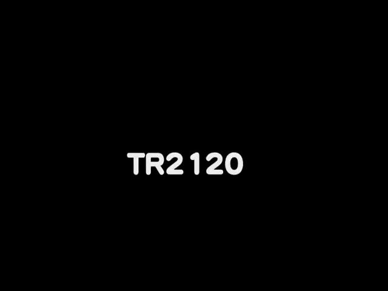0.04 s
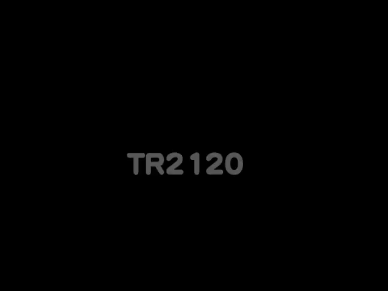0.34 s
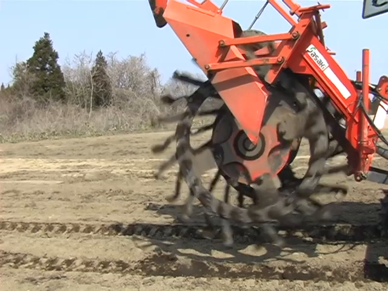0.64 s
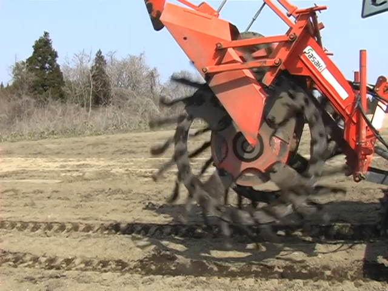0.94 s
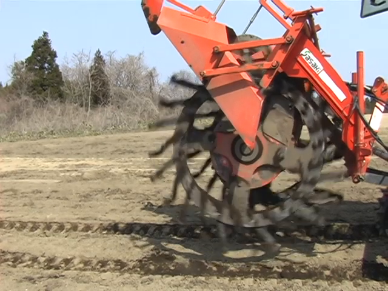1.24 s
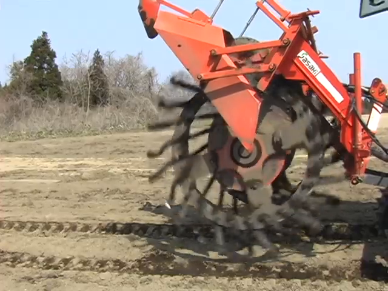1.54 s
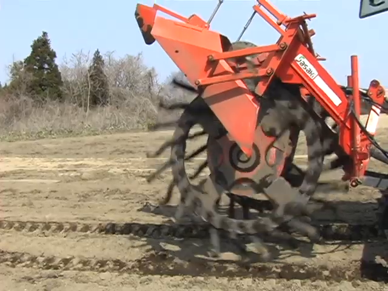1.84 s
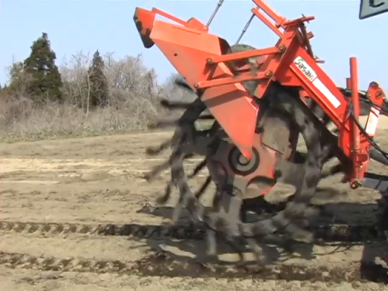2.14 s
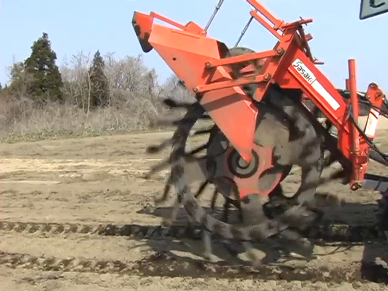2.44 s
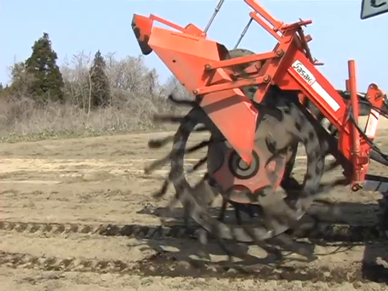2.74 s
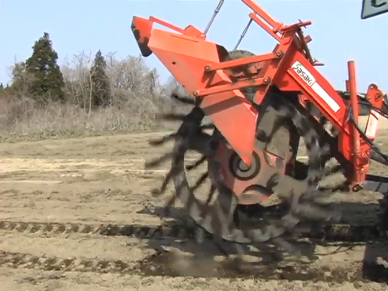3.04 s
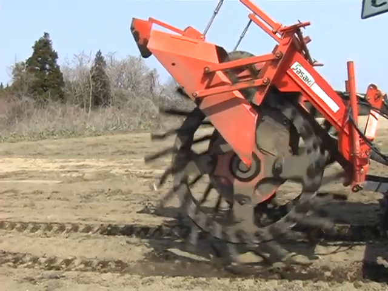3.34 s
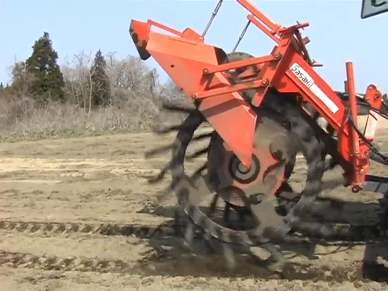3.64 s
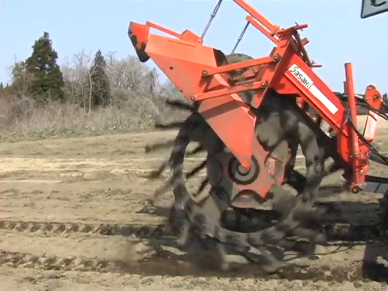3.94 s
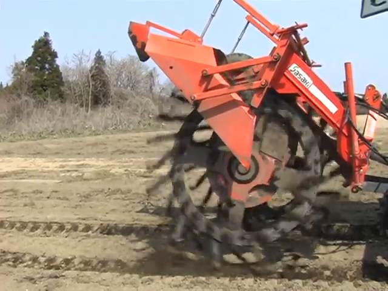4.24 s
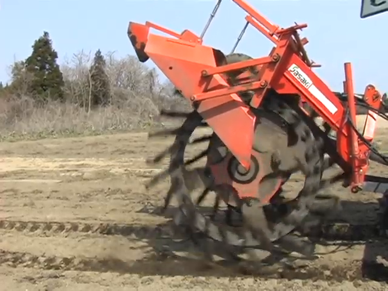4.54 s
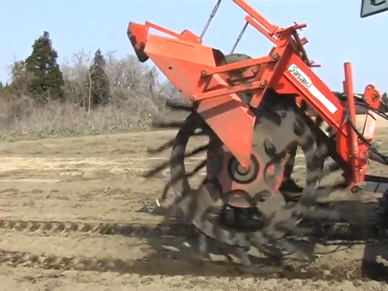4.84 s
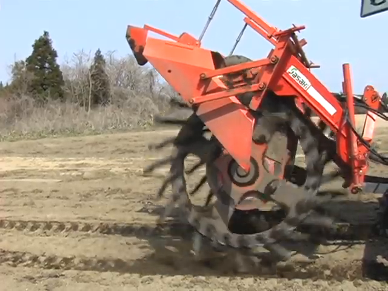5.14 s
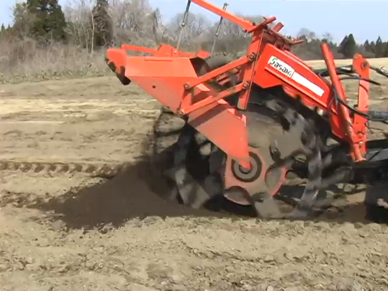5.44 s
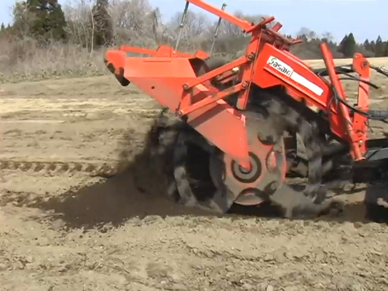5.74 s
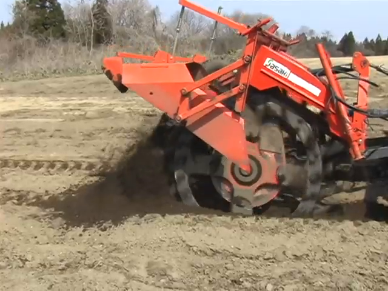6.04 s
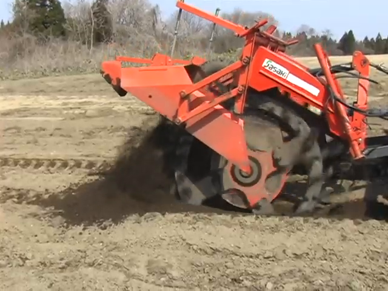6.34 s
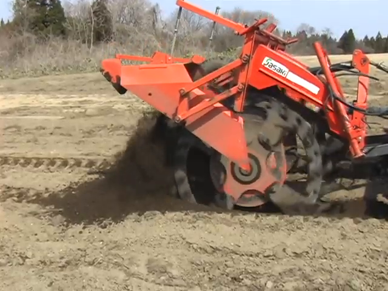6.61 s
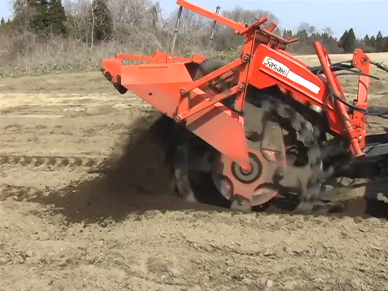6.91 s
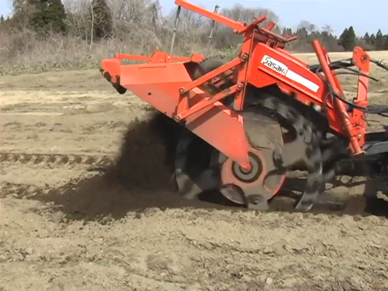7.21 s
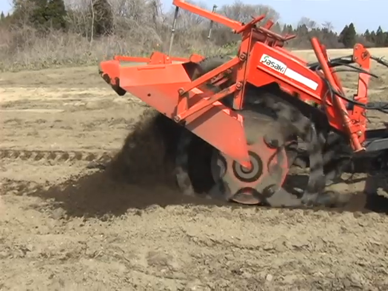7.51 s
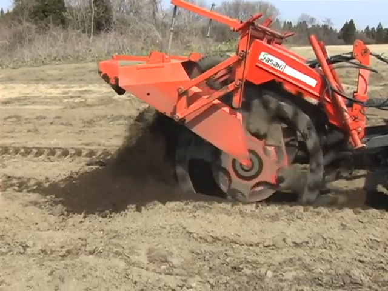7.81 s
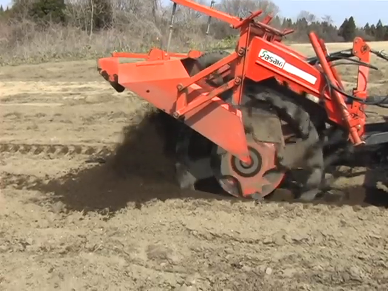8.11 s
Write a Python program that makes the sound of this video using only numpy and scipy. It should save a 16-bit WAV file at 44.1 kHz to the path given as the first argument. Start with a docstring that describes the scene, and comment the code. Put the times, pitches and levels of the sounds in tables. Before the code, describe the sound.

Heard close up in an open field, a loud diesel tractor engine drones and knocks steadily, slightly to the right, while gears hum and a toothed wheel spins in the air. Then the sound switches to digging, with churning earth, a whining drive and a hissing spray of soil straight ahead. Twice the engine dips in pitch and picks up again, and grit briefly ticks against metal.

```python
"""A four-cylinder diesel tractor chugs and clatters close by, spinning a toothed trencher wheel free. At 5.3 s
the scene changes and the wheel is already deep in the soil: earth rumbles and sprays, grit rattles on steel,
and the engine sags twice under load. Each firing thumps the exhaust and rings the block; the drive gears sing
in step with the crank. A close microphone pair stands beside the wheel in an open field, with the engine to its
right and the spray straight ahead."""
import sys
import numpy as np
from scipy import signal
from scipy.fft import rfft, irfft, next_fast_len
from scipy.io import wavfile

SR = 44100
rng = np.random.default_rng(int(sys.argv[2]) if len(sys.argv) > 2 else 0)


def transcribe(u):
    """Save the signal u as a 16-bit wav file named by the first command-line argument.

    u: samples, shape (n,) or (channels, n), limited to [-1, 1]; the rate is SR.
    q: integer samples, one column per channel.
    """
    v = np.clip(np.atleast_2d(u).T, -1, 1)
    q = np.round(v * 32767).astype(np.int16)
    wavfile.write(sys.argv[1], SR, q)


N = 369116
START_S, DIG_S = .634, 5.335
DIG_SPEED = 14.7141  # speeds and sags are in four-stroke cycles per second
TIME = np.arange(N) / SR
DIGGING = TIME >= DIG_S
PADDED = next_fast_len(N + 4096)
FREQS = np.maximum(np.arange(PADDED // 2 + 1) * SR / PADDED, 1)


# The throttle opening while the wheel spins free: t/s, speed/(cycles/s)
THROTTLE = [(.63, 13.8), (1.0685, 13.8622), (1.4875, 14.1435), (2.3813, 14.5118), (4.6138, 14.7302),
            (4.9695, 14.8889), (5.33, 14.8275)]

def engine_speed(droop_per_s=.0526):
    """The throttle sets the speed at first; in the soil the engine slowly tires and sags at each bite."""
    loaded = DIG_SPEED - droop_per_s * (TIME - DIG_S) - sag()
    return np.where(DIGGING, loaded, in_time(THROTTLE)[0])


def crank(speed):
    """Engine cycles, whole where the first cylinder fires; the shaft never turns quite evenly."""
    return np.cumsum(speed) / SR + np.where(DIGGING, .545, .175) + .00027 * drift(13)


# Engine orders (multiples of the cycle rate) leaving the exhaust pipe: f/Hz, level/dB
EXHAUST = [(80, -68), (105, -43), (131, -39.5), (145, -51), (165, -39.5), (195, -38), (222, -46),
           (310, -48), (365, -41), (480, -44.5), (590, -51), (700, -48), (780, -50), (900, -45)]
EXHAUST_ORDERS = 60

def exhaust(cycles, lead_cycles, smear_hz, firing_db, load_db):
    """Unequal cylinders chug once a cycle; the pipe smears the higher orders in time."""
    order = np.arange(2049)
    smear = np.minimum(order * DIG_SPEED / smear_hz, 2) ** 2 * rng.standard_normal(len(order))
    in_pipe = (order > len(CYLINDERS)) & (order < EXHAUST_ORDERS) & (order != GEAR_TEETH)
    firing = order % len(CYLINDERS) == 0
    above_boom = order > len(BOOM) * len(CYLINDERS)
    orders = np.exp(1j * smear) * in_pipe * np.where(firing, from_db(firing_db) * above_boom, 1)
    pulses = every_cycle(cycles + lead_cycles, orders)
    return from_db(load_db * DIGGING) * filtered(pulses, from_db(in_hz(EXHAUST)[0]))


def chug(pipe, speed, top_hz=260, full_speed=14.5, db_per_speed=6, uneven_db=2):
    """The deep part of the exhaust thumps harder as the throttle opens, never twice quite alike."""
    deep = filtered(pipe, 1 / (1 + (FREQS / top_hz) ** 12))
    level_db = np.where(DIGGING, 0, db_per_speed * np.minimum(speed - full_speed, 0))
    return pipe + deep * (from_db(level_db + uneven_db * drift(5.4)) - 1)


# Firing harmonics, first to fourth: free level/dB, digging level/dB
BOOM = [(-43.5, -44), (-40.5, -42.5), (-36.5, -40.5), (-39.5, -46)]
# Silencer resonances: f/Hz, width/Hz, boost/dB
SILENCER = [(113.7, 1.5, 8.5), (168, 7.5, 7), (220.5, 3.9, 6.5)]

def boom(cycles, speed, waver_db):
    """The lowest firing harmonics hum, swelling as they slide through the silencer's resonances."""
    hum = np.zeros(N)
    for harmonic, (free_db, dig_db) in enumerate(BOOM, 1):
        order = harmonic * len(CYLINDERS)
        level_db = np.where(DIGGING, dig_db, free_db) + waver_db * drift(1.2)
        level_db += sum(db * np.exp(-((order * speed - hz) / width) ** 2) for hz, width, db in SILENCER)
        hum += from_db(level_db) * order_tone(cycles, order)
    return hum


# Exhaust and fan noise at close range: f/Hz, level/(dB per Hz)
ROAR = [(20, -98), (42, -88), (75, -71), (120, -56), (145, -62), (185, -54), (250, -61.5), (370, -50),
        (470, -54.5), (600, -55), (720, -54), (800, -54.5), (950, -57.5), (2000, -59.5), (6000, -86.5),
        (15000, -100)]

def roar(cycles, throb_db, lead_cycles):
    """Exhaust and fan roar, swelling once a cycle just before the first cylinder fires."""
    throb = from_db(throb_db * np.cos(2 * np.pi * (cycles + lead_cycles)))
    return coloured(throb * engine_noise(cycles, repeat=.22), ROAR)


# Relative strength of the cylinders in firing order: free knock/dB, digging knock/dB, block ring/dB
CYLINDERS = [(-3, -8, -1), (-1, -13, -4), (-10, -6, -2.5), (2.5, -22, -4)]

def firings(cycles, cylinder_db, rise, decay, uneven_db):
    """An envelope that swells as each cylinder fires; rise and decay are in firing intervals."""
    firing, age = np.divmod(cycles * len(CYLINDERS), 1)
    firing = firing.astype(int)
    chance = (2 * rng.random(1024) - 1)[firing]
    strength = from_db(np.asarray(cylinder_db)[firing % len(CYLINDERS)] + uneven_db * chance)
    return strength * rms_one((1 - np.exp(-(age / rise) ** 2)) * np.exp(-age / decay))


# Combustion and valve clatter: f/Hz, relative level/(dB per Hz)
CLATTER = [(200, -83), (600, -64), (1000, -63), (1700, -62), (2300, -56.5), (3000, -60.5), (4000, -64),
           (5200, -66.5), (7000, -73), (10000, -74), (13000, -88), (15500, -96)]
# Modes of the engine block and covers: f/Hz, width/Hz, relative level/(dB per Hz)
BLOCK_MODES = [(1165, 40, -59.5), (1290, 25, -58), (1600, 16, -53), (1660, 14, -50), (1715, 16, -49.5),
               (2010, 36, -50.5), (2126, 20, -57), (2465, 31, -59), (3057, 60, -64), (3450, 50, -63.5),
               (4733, 60, -66), (4941, 35, -66)]

def clatter(cycles, speed, rough_db, db_per_speed):
    """Each firing rattles the engine and sets the block ringing, louder the faster it runs."""
    free_db, dig_db, block_db = np.transpose(CYLINDERS)
    free = firings(cycles, free_db, rise=.034, decay=.79, uneven_db=-4)
    loaded = firings(cycles, dig_db, rise=.08, decay=.36, uneven_db=4)
    swell = np.where(DIGGING, np.hypot(.78, .43 * loaded), np.hypot(.74, .4 * free))
    roughness = rms_one(from_db(rough_db * drift(97)))
    rattle = coloured(engine_noise(cycles, repeat=.16) * swell * roughness, CLATTER)
    shaking = engine_noise(cycles, repeat=.59)
    shaking *= rms_one(np.hypot(.3, firings(cycles, block_db, rise=.15, decay=.17, uneven_db=3)))
    ring = from_db(np.where(DIGGING, .4, 1.5)) * resonant(shaking, BLOCK_MODES)
    return from_db(db_per_speed * (speed - 17.1)) * (rattle + ring)


# The first cylinder's blow and rebounds: lag/cycles, f/Hz, rise/s, free peak/dB, digging peak/dB
KNOCK = [(-.012, 1400, .0013, -21.5, -21.5), (-.005, 2350, .0011, -27, -21), (.008, 1750, .001, -19, -20),
         (.027, 2060, .0014, -15, -17), (.042, 2400, .0013, -30, -22)]
# Knocks that land much harder than the rest: t/s, boost/dB
HARD_KNOCKS = [(6.835, 5), (6.903, 5), (7.177, 2), (7.245, 4.5), (7.383, 4), (7.452, 4), (7.522, 2.5),
               (7.871, 2), (7.94, 5), (8.009, 4.5), (8.078, 4.5)]

def diesel_knock(cycles, db_per_sag=-14):
    """The first cylinder knocks every cycle: softer while the engine labours, now and then much harder."""
    change_db = db_per_sag * sag()
    for s, db in HARD_KNOCKS:
        that_cycle = np.round(cycles) == np.round(np.interp(s, TIME, cycles))
        change_db[that_cycle] = db
    return from_db(change_db) * blows(cycles, KNOCK)


# Lighter clacks of the other cylinders: lag/cycles, f/Hz, rise/s, free peak/dB, digging peak/dB
CLACKS = [(.268, 1690, .0013, -17.5, -19.5), (.35, 1400, .001, -22.5, -28), (.476, 2300, .0009, -24, -23),
          (.497, 1680, .0013, -20, -22), (.542, 1980, .0013, -19.5, -20.5), (.742, 2000, .0011, -22.5, -26),
          (.77, 1560, .0014, -18, -19.5)]
# Brief mid-range rings, a few in each cycle: lag/cycles, f/Hz, rise/s, free peak/dB, digging peak/dB
BARKS = [(.37, 700, .0026, -26, -31), (.555, 820, .0024, -24, -28), (.7, 700, .0024, -22.5, -21.5),
         (.835, 680, .0027, -26, -24)]

def blows(cycles, rows, uneven_db=1.8, detune=.035):
    """Each blow comes once a cycle and rings briefly at its own pitch, never twice quite alike."""
    rings = np.zeros(N)
    for lag, hz, rise_s, free_db, dig_db in rows:
        cycle, age = np.divmod(cycles - lag, 1)
        strength, pitch = rng.standard_normal((2, 256))[:, cycle.astype(int)]
        age_s = age / DIG_SPEED
        envelope = (age_s / rise_s * np.exp(1 - age_s / rise_s)) ** 2
        level_db = np.where(DIGGING, dig_db, free_db) + uneven_db * strength
        rings += from_db(level_db) * envelope * np.sin(2 * np.pi * hz * (1 + detune * pitch) * age_s)
    return rings


# Tones of the block: engine order
BLOCK_ORDERS = (96, 100, 114, 118, 137)
# Strength of each of those tones: free level/dB
BLOCK_ORDER_DB = (-40.5, -40, -41, -41, -40.5)

def block_tones(cycles, waver_db, load_db):
    """High engine orders sing in the block, pumped by each firing."""
    block_db = np.transpose(CYLINDERS)[2]
    pumping = rms_one(1.2 + firings(cycles, block_db, rise=.06, decay=.58, uneven_db=-1))
    tones = sum(from_db(db + waver_db * drift(.68)) * order_tone(cycles, order)
                for order, db in zip(BLOCK_ORDERS, BLOCK_ORDER_DB))
    return from_db(load_db * DIGGING) * pumping * tones


GEAR_TEETH = 40

def gear_mesh(cycles, speed, db_per_speed=9, db_per_sag=2.5):
    """The drive gears mesh in step with the engine, louder with speed when free and with sag when digging."""
    free_db = -34 + db_per_speed * (speed - DIG_SPEED)
    dig_db = -29.8 + db_per_sag * sag()
    level = from_db(np.where(DIGGING, dig_db, free_db) + drift(5.6))
    return np.sqrt(2) * level * np.sin(2 * np.pi * GEAR_TEETH * cycles + .17 * drift(22))


def drive_whine(hz=1319, hz_per_sag=89, labour_db=4, full_sag=.096):
    """In the soil the drive whines, climbing and swelling as the wheel labours."""
    labour = sag(late_s=.0845)
    turns = np.cumsum(hz + hz_per_sag * labour + 3 * drift(19.1)) / SR
    level_db = -36 + labour_db * np.tanh(labour / full_sag) + 1.4 * drift(7)
    return DIGGING * np.sqrt(2) * from_db(level_db) * np.sin(2 * np.pi * turns)


# The other gears: engine order, free level/dB, digging level/dB
GEAR_TONES = [(39, -50, -39.5), (46, -40.5, -46), (48, -44, -43), (51, -42, -44), (54, -44, -38)]

def gear_tones(cycles, waver_db):
    """Other gears sing more faintly, their balance changing once the wheel is under load."""
    tones = np.zeros(N)
    for order, free_db, dig_db in GEAR_TONES:
        level_db = np.where(DIGGING, dig_db, free_db) + waver_db * drift(9.7)
        tones += from_db(level_db) * order_tone(cycles, order)
    return tones


# Earth churned by the teeth, beside the microphones: f/Hz, relative level/(dB per Hz)
EARTH = [(40, -97), (120, -57), (300, -52.5), (440, -53), (600, -56.5), (780, -52.5), (950, -79),
         (1120, -49), (1500, -104), (2300, -67.5), (5200, -71.5), (7000, -103), (15000, -102)]

def earth(lumpy_db, level_db):
    """Clods rumble as they are torn out of the trench in lumps."""
    clods = rng.standard_normal(N) * rms_one(from_db(lumpy_db * drift(28)))
    return DIGGING * from_db(level_db) * coloured(clods, EARTH)


# The wheel bites deeper: t/s, length/s, spray arch/dB, delay before the sag/s, sag/(cycles/s)
BITES = [(5.8, .56, 0, .0685, .7313), (7.33, .44, -10.5, .0043, .3462)]

def sag(late_s=0, drop_s=.2457, recover_s=.5712):
    """Engine speed lost to the bites: a quick drop, then the governor pulls it back."""
    return sum(depth * np.interp(TIME - s - delay - late_s, [0, drop_s, drop_s + recover_s], [0, 1, 0])
               for s, _, _, delay, depth in BITES)


def thrown_soil(trickle_db=-30, overhang_s=.05, puff_db=-10, puff_s=.04):
    """Flow of the spray: a trickle, and for each bite an arch between puffs as the teeth go in and out."""
    flow = from_db(trickle_db)
    for s, length, db, _, _ in BITES:
        from_middle = (TIME - s - length / 2) / (length / 2 + overhang_s)
        arch = np.maximum(1 - from_middle ** 2, 0) ** 1.5
        puffs = sum(np.exp(-((TIME - edge) / puff_s) ** 2) for edge in (s, s + length))
        flow = np.hypot(flow, np.hypot(from_db(db) * arch, from_db(puff_db) * puffs))
    return flow


# Hiss of fine soil and grit: f/Hz, relative level/(dB per Hz)
SPRAY_COLOUR = [(1500, -86), (4000, -71), (5500, -68.5), (7000, -84.5), (8500, -73), (10000, -68),
                (12500, -69.5), (14500, -76), (15600, -83)]

def spray(grain_db, clump_db, width, level_db):
    """Fine grains hiss in clumps as they fly, in a broad cloud straight ahead of the microphones."""
    mid, side = rng.standard_normal((2, N))
    cloud = mid + width * side * [[1], [-1]]
    grains = rms_one(cloud * from_db(grain_db * drift(450) + clump_db * drift(30)))
    return DIGGING * from_db(level_db) * thrown_soil() * coloured(grains, SPRAY_COLOUR)


# Grit striking steel, centred between the microphones: t/s, relative level/dB
GRIT_HITS = [(5.3373, -12), (7.1202, -8), (7.1393, -10), (7.9642, -14), (8.0611, -5), (8.2995, -10)]

def grit(decay_s, grain_db):
    """Grit rattles on the steel in short scatters."""
    envelope = sum(from_db(db) * (TIME >= s) * np.exp(-np.abs(TIME - s) / decay_s) for s, db in GRIT_HITS)
    grains = rms_one(rng.standard_normal(N) * from_db(grain_db * drift(400)))
    return coloured(envelope * grains, SPRAY_COLOUR)


# Squeaks from the machine: t/s, f/Hz, level/dB, decay/s
SQUEAKS = [(4.495, 4941, -30.5, .06), (4.503, 1410, -16, .02), (7.14, 4941, -31, .025)]

def squeaks(rough_db, rise_s=.008):
    """Steel chirps briefly and roughly, then dies away."""
    chirps = np.zeros(N)
    for s, hz, db, decay_s in SQUEAKS:
        age = np.maximum(TIME - s, 0)
        envelope = (1 - np.exp(-age / rise_s)) * np.exp(-age / decay_s)
        chirps += from_db(db) * envelope * np.sin(2 * np.pi * hz * age + .6 * drift(60))
    return chirps * from_db(rough_db * drift(80))


def field_wash():
    """Roar and clatter scattered off the field: a steady noise, different at each microphone."""
    level = np.hypot(from_db(in_hz(ROAR)[0]), from_db(in_hz(CLATTER)[0]))
    return filtered(rng.standard_normal((2, N)), level * np.sqrt(SR / 2))


# The pair beside the wheel: f/Hz, colour/dB, left minus right/dB, left lead/rad, scattered level/dB
MICS = [(60, 0, 0, 0, -10), (170, 0, 0, -.06, -20), (400, 0, -.1, -.2, -21), (650, 0, -.6, -.42, -19),
        (1000, 0, -1.4, -.57, -15), (2300, 0, -4.9, -.92, -11), (5400, 0, -4, -.95, -10),
        (6400, -2.5, -3.5, -2, -10), (7100, -7, -3, -2.8, -9), (9100, 0, -3, -4, -9),
        (10200, 1, -2, -5, -9), (12000, 0, -1, -6.2, -10), (13500, 0, -1, -6.5, -10),
        (15200, -1, -1, -6.9, -10)]

def microphones(near, diffuse):
    """The machine reaches the right microphone earlier and louder; the wash comes to both alike in level."""
    colour_db, balance_db, lead, scatter_db = in_hz(MICS)
    sides = np.array([[1], [-1]])
    direct = from_db(colour_db + sides * balance_db / 2) * np.exp(.5j * sides * lead)
    return filtered(near, direct) + filtered(diffuse, from_db(colour_db + scatter_db))


def engine_noise(cycles, repeat):
    """Noise of which the share `repeat` recurs every engine cycle, above the range of the exhaust."""
    orders = np.exp(2j * np.pi * rng.random(2049))
    nyquist_order = int(SR / 2 / DIG_SPEED)
    orders[:EXHAUST_ORDERS] = orders[list(BLOCK_ORDERS)] = orders[nyquist_order:] = 0
    recurring = rms_one(every_cycle(cycles, orders))
    return np.sqrt(repeat) * recurring + np.sqrt(1 - repeat) * rng.standard_normal(N)


def every_cycle(cycles, orders):
    """A wave that repeats with each engine cycle, from the complex rms level of each order."""
    wave = irfft(orders) * np.sqrt(2) * (len(orders) - 1)
    return np.interp(cycles % 1 * len(wave), np.arange(len(wave) + 1), np.append(wave, wave[0]))


def order_tone(cycles, order):
    """A sine of rms 1 and random phase, locked to the crank."""
    return np.sqrt(2) * np.sin(2 * np.pi * (order * cycles + rng.random()))


def resonant(x, modes):
    """Ring parallel resonances with a white excitation."""
    response = sum((-1) ** k * from_db(db) / (1 + 1j * hz / width * (FREQS / hz - hz / FREQS))
                   for k, (hz, width, db) in enumerate(modes))
    return filtered(x, response * np.sqrt(SR / 2))


def drift(rate_hz, hop=40, settle=2000):
    """A smooth, bounded random wander with spread near 1, mostly slower than `rate_hz`."""
    pole = np.exp(-2 * np.pi * hop * rate_hz / SR)
    noise = rng.standard_normal(N // hop + settle + 2)
    slow = signal.lfilter([1], [1, -2 * pole, pole * pole], noise)[settle:]
    return np.interp(np.arange(N) / hop, np.arange(len(slow)), np.clip(rms_one(slow), -2, 2))


def coloured(x, spectrum):
    """Give a white excitation a spectrum in dB per Hz."""
    return filtered(x, from_db(in_hz(spectrum)[0]) * np.sqrt(SR / 2))


def filtered(x, response):
    """Pass a signal through a frequency response."""
    return irfft(rfft(x, PADDED) * response, PADDED)[..., :N]


def in_time(rows):
    """The columns of a curve at every sample."""
    s, *columns = np.transpose(rows)
    return [np.interp(TIME, s, c) for c in columns]


def in_hz(rows):
    """The columns of a spectrum at every frequency."""
    hz, *columns = np.transpose(rows)
    return [np.interp(np.log(FREQS), np.log(hz), c) for c in columns]


def from_db(db):
    """Decibels to gain."""
    return 10 ** (np.asarray(db) / 20)


def rms_one(x):
    """Scale to rms 1."""
    return x / np.sqrt(np.mean(x ** 2) + 1e-20)


def scene():
    """Engine, drive and soil, heard from beside the wheel; the sound starts abruptly."""
    speed = engine_speed()
    cycles = crank(speed)
    engine = boom(cycles, speed, waver_db=.8) + block_tones(cycles, waver_db=1.5, load_db=-1.5)
    pipe = exhaust(cycles, lead_cycles=.07996, smear_hz=170, firing_db=6, load_db=-1.5)
    engine += chug(pipe, speed)
    engine += roar(cycles, throb_db=.5, lead_cycles=.16)
    engine += clatter(cycles, speed, rough_db=2, db_per_speed=.93)
    engine += diesel_knock(cycles) + blows(cycles, CLACKS) + blows(cycles, BARKS)
    drive = gear_mesh(cycles, speed) + drive_whine() + gear_tones(cycles, waver_db=2)
    machine = microphones(engine + drive + squeaks(rough_db=3), field_wash())
    soil = (earth(lumpy_db=2, level_db=-.9)
            + spray(grain_db=2.6, clump_db=.6, width=.32, level_db=3.6)
            + grit(decay_s=.012, grain_db=3))
    return (machine + soil) * (TIME >= START_S)


def record(dry, cutoff_hz=15550):
    """The highest treble is cut steeply."""
    return signal.sosfilt(signal.ellip(12, .1, 90, cutoff_hz, fs=SR, output="sos"), dry)


dry = scene()
out = record(dry)
transcribe(out)
```